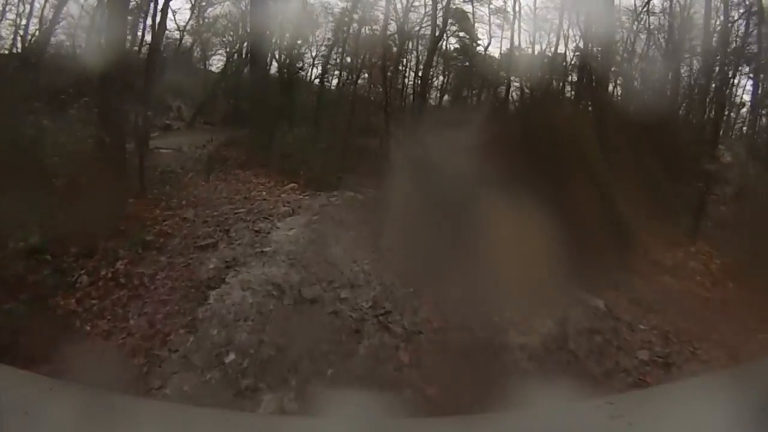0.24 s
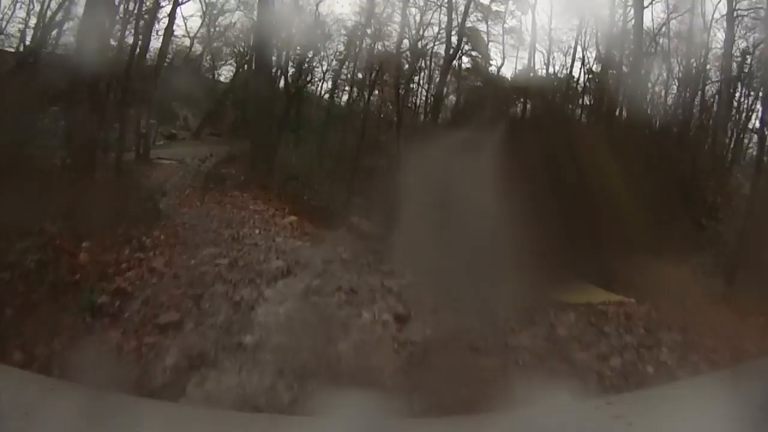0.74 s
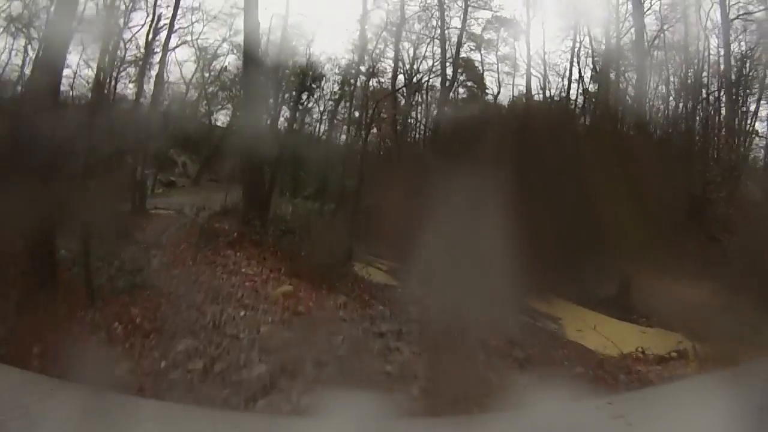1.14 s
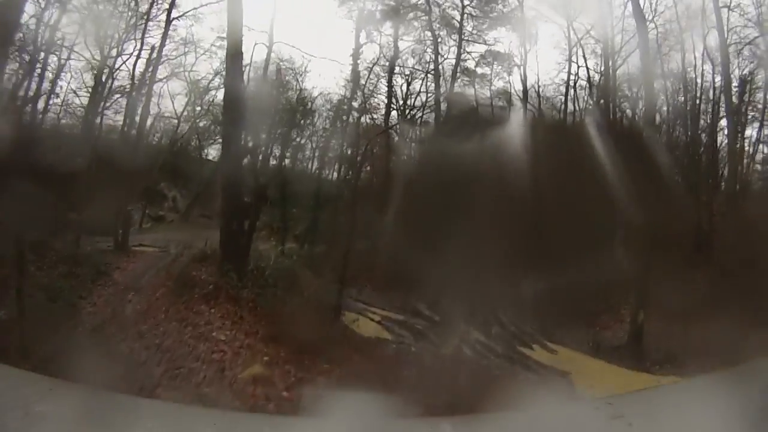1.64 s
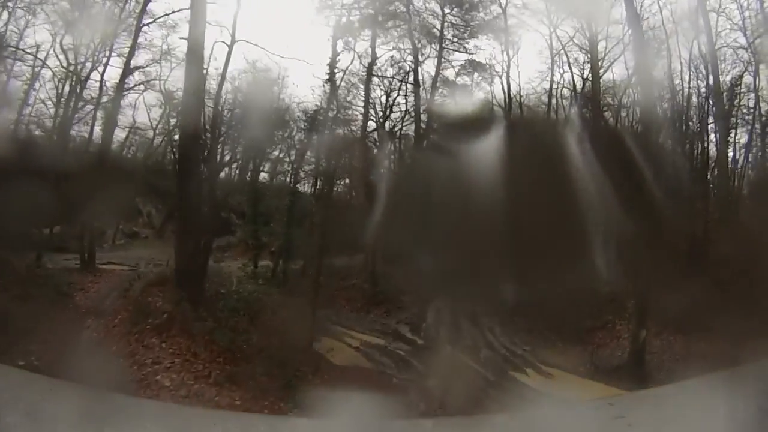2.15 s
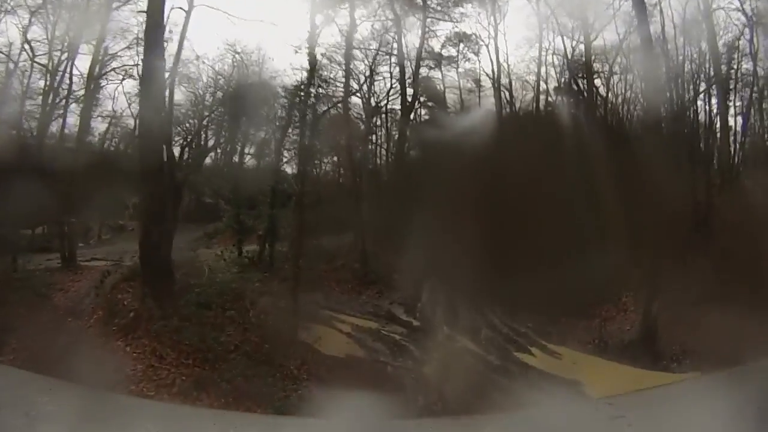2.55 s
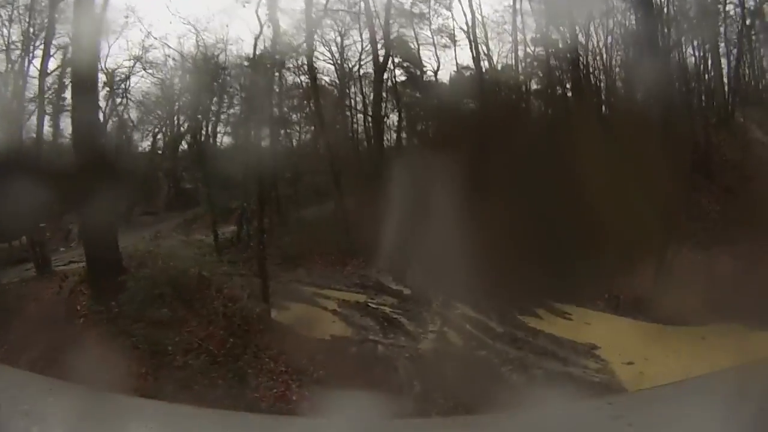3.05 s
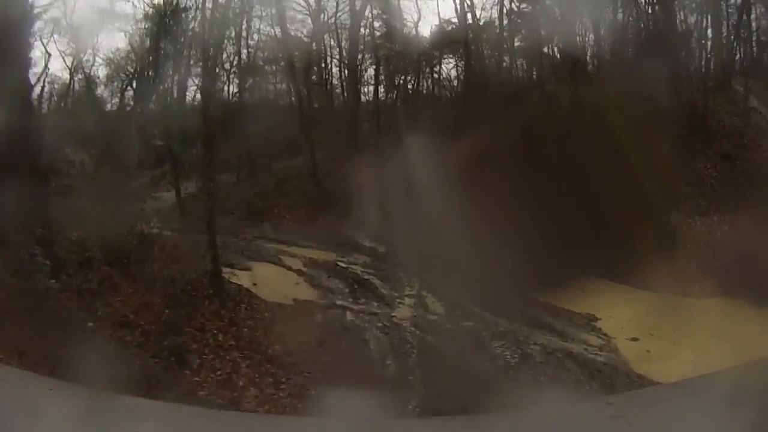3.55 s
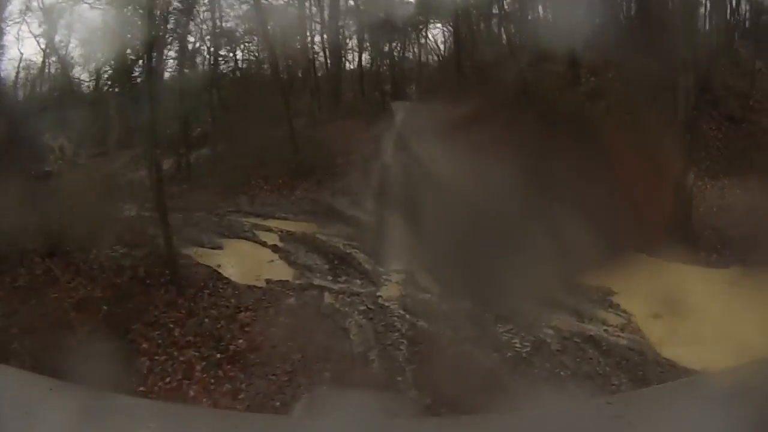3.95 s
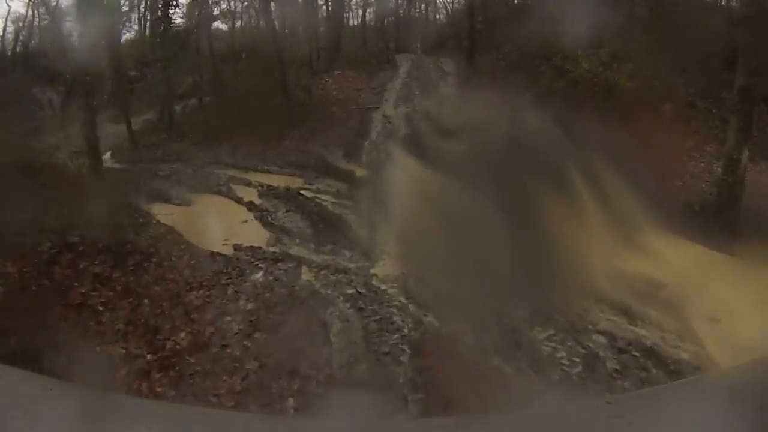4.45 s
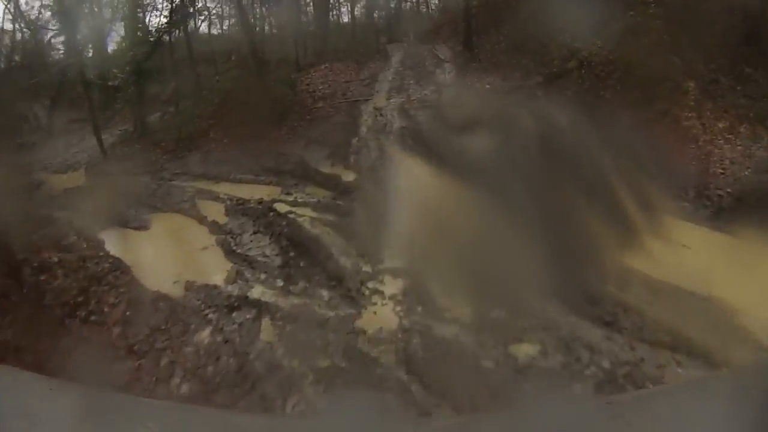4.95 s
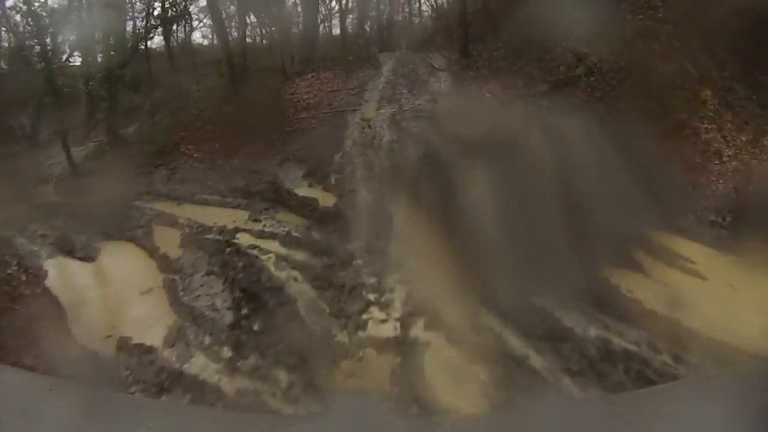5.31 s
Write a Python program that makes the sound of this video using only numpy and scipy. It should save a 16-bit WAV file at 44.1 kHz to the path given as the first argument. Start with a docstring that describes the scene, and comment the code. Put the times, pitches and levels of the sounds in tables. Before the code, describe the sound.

A diesel 4x4 crawls through wet woodland, heard in mono from a camera in a plastic case mounted on the vehicle. A deep, fluttering engine drone rises slightly in pitch and grows strong from about 0.9 to 2.3 s, over chassis rumble, buzzing steel clatter and a fine patter of drops. A very faint hiss lies underneath. Big drops knock on the panels, short and metallic with a dull thud, at 0.6, 1.0 and 1.35 s, the last with a sharp plastic snap. The loudest dry snap hits at 2.4 s, just as the revs sag and the drone fades. Knocks cluster from 2.6 to 3.7 s, hard at 2.9 and 3.4 s, while the body bounces and hums low. After 4.2 s the revs climb steadily; knocks fall at 4.25 and 4.85 s, and a heavier low bounce swells at the end, around 5.5 s.

```python
"""Wet wood, on the bodywork of a crawling diesel 4x4, by a camera in a plastic case.
The engine's firing orders are wavering sines, over noise shaped into chassis rumble and bounce.
Combustion clatter and a patter of small drops buzz the steel panels; a faint hiss lies beneath.
Big drops from the trees knock on the panels as sums of decaying plate modes with a dull thud.
A few drops tick on the case itself as short, dense modes and one hollow tone."""
import sys
import numpy as np
from scipy import signal
from scipy.fft import rfft, irfft
from scipy.io import wavfile
from scipy.ndimage import uniform_filter1d

SR = 44100
rng = np.random.default_rng(int(sys.argv[2]) if len(sys.argv) > 2 else 0)


def wav_out(sig):
    """Save sig, one row per channel (or a flat mono array), as 16-bit PCM at SR to the path in sys.argv[1]."""
    wavfile.write(sys.argv[1], SR, np.round(np.clip(np.atleast_2d(sig).T, -1, 1) * 32767).astype(np.int16))


N = 246071
T = np.arange(N) / SR  # s


def amp(db):
    """Decibels to gain."""
    return 10 ** (np.asarray(db) / 20)


def evened(x):
    """Scales to rms 1."""
    return x / np.sqrt(np.mean(x ** 2) + 1e-20)


def read(hz, table, column=1):
    """Reads a spectrum table on a log-frequency axis."""
    rows = np.array(table)
    return np.interp(np.log(hz + 1), np.log(rows[:, 0] + 1), rows[:, column])


def curve(table, column):
    """Reads a control curve at every sample."""
    rows = np.array(table)
    return np.interp(T, rows[:, 0], rows[:, column])


def add(mix, start_s, sound):
    """Mixes a sound in at its start time, cut at the end of the mix."""
    part = mix[round(start_s * SR):][:len(sound)]
    part += sound[:len(part)]


def coloured(spectrum, gate=1, colour_db=None):
    """Noise of rms 1, gated if wished, kept inside a table's range and coloured by it or by colour_db."""
    hz = np.fft.rfftfreq(N, 1 / SR)
    inside = (hz > spectrum[0][0]) & (hz < spectrum[-1][0])
    level_db = colour_db(hz) if colour_db else read(hz, spectrum)
    noise = gate * rng.standard_normal(N)
    return evened(irfft(rfft(noise) * amp(level_db) * inside, N))


def wobble(seconds):
    """Slow random drift of rms 1: noise averaged twice over the given time."""
    size = max(int(seconds * SR), 1)
    once = uniform_filter1d(rng.standard_normal(N), size)
    return evened(uniform_filter1d(once, size))


FLUTTER_S = 0.074  # averaging time of the level flutter in engine and body

# Engine speed. Each row: time in seconds, firings per second.
FIRING_RATE = [(0.0, 30.8), (0.3, 32.7), (0.57, 32.8), (0.9, 35.5), (1.12, 36.7), (1.3, 36.3), (1.54, 37.4),
               (1.86, 37.4), (2.1, 35.7), (2.36, 34.5), (2.53, 30.2), (2.64, 29.2), (3.15, 28.8),
               (3.3, 27.9), (3.8, 28.2), (4.1, 29.5), (4.27, 34.4), (4.49, 35.1), (4.68, 37.6),
               (4.99, 42.0), (5.14, 42.4), (5.46, 46.0), (5.58, 46.0)]


def engine_speed():
    """Firings per second; the flywheel evens the speed over a tenth of a second."""
    return uniform_filter1d(curve(FIRING_RATE, column=1), SR // 10)


# The drone at the firing rate, loudest under load near the pitch of the body.
# Each row: time in seconds, level in dB.
DRONE = [(0.0, -33.5), (0.3, -30.5), (0.6, -20), (0.79, -28), (0.9, -16.5), (1.12, -16), (1.46, -17.5),
         (1.85, -15), (2.24, -16), (2.36, -19.5), (2.52, -36), (3.15, -44), (3.5, -30), (4.4, -32),
         (4.6, -22), (4.86, -16), (4.99, -26), (5.27, -25), (5.5, -23), (5.58, -23)]
# The higher multiples of the firing rate that sound.
UPPER_ORDERS = (2, 3, 5, 7)
# How the bodywork passes those upper orders. Each row: frequency in Hz, level in dB.
ORDER_PATH = [(56, -36), (74, -35.5), (87, -38), (105, -48.5), (122, -41.5), (140, -43), (160, -49.5),
              (185, -42), (205, -45), (230, -54.5), (255, -65), (320, -63)]
DRONE_FLUTTER_DB, ORDER_FLUTTER_DB = 0.6, 3  # rms


def exhaust(turns, rate):
    """Firing orders as slightly wavering sines; the upper ones swell where the bodywork passes them."""
    levels_db = [curve(DRONE, column=1) + DRONE_FLUTTER_DB * wobble(FLUTTER_S)]
    for order in UPPER_ORDERS:
        levels_db.append(read(order * rate, ORDER_PATH) + ORDER_FLUTTER_DB * wobble(FLUTTER_S))
    out = np.zeros(N)
    for order, level_db in zip((1,) + tuple(UPPER_ORDERS), levels_db):
        waver = 0.02 * order * wobble(0.11)  # radians
        phase = 2 * np.pi * (order * turns + rng.random()) + waver
        out += np.sqrt(2) * amp(level_db) * np.sin(phase)
    return out


# Shaking of the vehicle; the last column drives the panel buzz further down.
# Each row: time in seconds, body bounce in dB, chassis rumble in dB, panel buzz in dB.
SHAKE = [(0.0, -56, -37, -38.5), (0.39, -34, -34.5, -38), (2.1, -36, -35, -36.5), (2.75, -44.5, -35.5, -39),
         (3.26, -29, -34.5, -41.5), (3.64, -27.5, -35.5, -39.5), (4.26, -36, -35.5, -40.5),
         (4.94, -41, -33, -39), (5.31, -32.5, -32.5, -38.5), (5.58, -19, -32.5, -37)]
# Colour of the chassis rumble. Each row: frequency in Hz, level in dB per Hz.
RUMBLE = [(15, -18), (44, -4.5), (60, -12.5), (93, -9), (115, -16), (150, -16), (185, -15.5), (203, -8),
          (225, -14), (250, -23.5), (280, -19), (311, -26.5), (370, -27), (450, -30.5)]
# The body rings at its own pitch, beating with the engine whenever the revs are away from it.
# Each row: time in seconds, pitch in Hz, level in dB.
BODY = [(2.4, 38.35, -46), (2.55, 39, -40), (3.0, 39.6, -38), (3.13, 39.2, -44), (3.45, 37.08, -31.5),
        (3.8, 36.86, -29), (4.15, 37.06, -31), (4.35, 36.7, -32), (4.85, 36.58, -50), (5.1, 36.66, -35),
        (5.35, 34.8, -30), (5.58, 34.7, -41)]
BOUNCE_HZ, BOUNCE_WIDTH_HZ = 52, 44
BODY_FLUTTER_DB = 3  # rms


def chassis():
    """Bumps shake a broad low mode and set the body ringing, over a wide rumble."""
    hz = np.fft.rfftfreq(N, 1 / SR)
    mode = 1 / (1 + (2 * (hz - BOUNCE_HZ) / BOUNCE_WIDTH_HZ) ** 4)
    bounce = evened(irfft(rfft(rng.standard_normal(N)) * mode, N))
    rumble = amp(1.3 * wobble(0.03)) * coloured(RUMBLE)
    cycles = np.cumsum(curve(BODY, column=1)) / SR + rng.random()
    ring_db = curve(BODY, column=2) + BODY_FLUTTER_DB * wobble(FLUTTER_S)
    ringing = np.sqrt(2) * amp(ring_db) * np.sin(2 * np.pi * cycles)
    return amp(curve(SHAKE, column=1)) * bounce + amp(curve(SHAKE, column=2)) * rumble + ringing


# Broad colour of the steel panels. Each row: frequency in Hz, level in dB per Hz.
PANEL = [(350, -7.5), (470, -5.5), (520, 1.5), (750, -3), (1050, -8), (1220, -12.5), (1600, -1),
         (1950, -13.5), (2200, -2.5), (2650, -16), (3100, -16.5), (3400, -33), (3800, -35.5), (4150, -24),
         (4450, -26), (4750, -23), (5150, -31), (5600, -27), (6400, -72)]
# Their strongest resonances. Each row: frequency in Hz, width in Hz, dB above the rest.
PANEL_PEAKS = [(515.4, 50, 5), (625, 187, 4.5), (840, 24, 4), (1105, 33, 9.5), (1720, 82, 7),
               (2217, 420, 0.5), (2860, 48, 3), (3610, 90, 8), (5470, 250, 5.5)]


def panel_db(hz):
    """The colour of the steel in dB: a broad spectrum with its resonances on top."""
    peaks = sum(db / (1 + (2 * (hz - peak_hz) / width_hz) ** 2) for peak_hz, width_hz, db in PANEL_PEAKS)
    return read(hz, PANEL) + peaks


# How a struck panel rings: bending waves carry treble first, bass arrives late and lasts. Each row:
# frequency in Hz, rise in seconds, time to fall 60 dB in seconds, dB by which a blow favours it.
PANEL_RING = [(390, 0.0091, 0.27, -14.5), (560, 0.0018, 0.2, -13), (806, 0.0011, 0.23, -8),
              (1500, 0.003, 0.13, -2.5), (2940, 0.001, 0.11, 6.5), (6000, 0.00064, 0.08, 3.5)]


def panel_blows(lows_db, highs_db, length, crack_db):
    """One blow a row: dense plate modes, struck with other phases at each spot."""
    hz = (np.linspace(350, 6400, 400) + rng.uniform(-7, 7, 400))[:, None]
    t = np.arange(6000) / SR
    rise = 1 - np.exp(-t / read(hz, PANEL_RING))
    fade = amp(-60 * t / read(hz, PANEL_RING, column=2))
    mode_db = panel_db(hz) + read(hz, PANEL_RING, column=3)
    modes = amp(mode_db) * rise * fade * np.exp(2j * np.pi * hz * t)
    lows = np.clip((1300 - hz.T) / 400, 0, 1)  # full below 900 Hz
    highs = np.clip((hz.T - 3400) / 500, 0, 1)  # full above 3900 Hz
    spot = np.exp(2j * np.pi * rng.random((len(length), 400)))
    struck = spot * amp(lows_db[:, None] * lows + highs_db[:, None] * highs)
    # the direct wave, without the lows, before the plate fills
    crack = amp(crack_db)[:, None] * np.exp(-t / 0.0016)
    blows = (struck @ modes).real + crack * (struck * (1 - lows) @ modes).real
    blows /= np.sqrt(np.mean(blows[:, :300] ** 2, axis=1, keepdims=True))  # even the onsets
    # a wetter spot, of length under 1, damps all modes sooner
    damping = 1 / np.clip(length, 0.2, 1.5)[:, None] - 1
    return 0.3 * blows * amp(-600 * t * damping)


DROPS_PER_S, PATTER_DB = 160, -5.5  # small drops; level against the clatter


def buzz(turns):
    """The panels buzz: noise puffed by each firing, plus a patter of small drops."""
    firing_gain = amp(2.1 * np.clip(rng.standard_normal(400), -2, 2))  # no two firings alike
    strength = firing_gain[turns.astype(int)]
    # each puff jumps up, then sags until the next firing
    puffs = uniform_filter1d(0.2 + 2.3 * strength * np.exp(-(turns % 1) / 2.7), 150)
    clatter = coloured(PANEL, puffs * amp(0.8 * wobble(0.008)), panel_db)
    size = amp(3.5 * np.minimum(rng.exponential(1, N), 2))
    drops = size * (rng.random(N) < DROPS_PER_S / SR)
    spot, flat = rng.integers(0, 12, N), np.zeros(12)  # twelve spots on the steel
    blows = panel_blows(flat, flat, length=flat + 0.49, crack_db=flat - 3.0)
    patter = evened(sum(signal.oaconvolve(drops * (spot == k), b)[:N] for k, b in enumerate(blows)))
    return amp(curve(SHAKE, column=3)) * evened(clatter + amp(PATTER_DB) * patter)


# Colour of the hiss. Each row: frequency in Hz, level in dB per Hz.
HISS = [(3300, -26), (6000, -9), (7040, -12.5), (11300, -14.5), (13900, -17.5), (14700, -19)]
HISS_DB = -68


def hiss():
    """A faint bed of treble noise whose level flickers quickly."""
    return amp(HISS_DB + 1.54 * wobble(0.0086)) * coloured(HISS)


# Drops on the case. Each row: start in seconds, relative level in dB, pitch of the hollow in Hz,
# hollow in dB, modes under 5 kHz in dB, modes over 9 kHz in dB.
TICKS = [(0.1366, -39, 1670, -6, -2, 16), (0.5408, -33, 2120, -5, 3, 18), (0.631, -36, 2130, -3.5, -4, 20),
         (0.9733, -26.5, 1720, -4, 17.5, 11.5), (1.3512, -4.5, 2680, -9, 1, 5.5),
         (1.3562, -13.5, 2250, -14, 11.5, 6), (2.3844, 2, 1880, -4, -4, -1), (2.4103, -29, 2140, 1, 5, 15),
         (2.5741, -20.5, 2420, -8, 10, 14), (2.8625, -13.5, 1910, 4, 0, 10), (2.936, -36, 2120, -3, -1, 16),
         (3.3962, -35, 2280, -10, -3, 22), (3.4141, -22, 2260, -5, 6, 15), (3.4552, -31, 2680, -3, 0, 10),
         (3.46, -26.5, 2180, 4, -11, 7), (3.531, -13.5, 2500, 2, 3, 3), (3.5862, -36, 2124, 4, 0, 15),
         (3.6691, -28.5, 1770, -1, 11, 16), (3.8578, -18.5, 1500, 8, 3, 12), (4.244, -39, 2130, -3, 4, 19),
         (4.597, -29.5, 2100, -12, 2, 6), (4.8382, -30.5, 2260, 5, 11, 9), (5.3328, -24.5, 1600, 0, 8.5, 5)]
# Colour of the case. Each row: frequency in Hz, level in dB per Hz.
CASE = [(650, -45), (1100, -6), (1990, -5), (2910, -3), (3730, -18), (4580, -5.5), (5150, -18), (5550, -8),
        (5920, -2.5), (6480, -19.5), (7200, -8), (8700, -20), (10300, -34), (12400, -26.5), (13500, -32),
        (14700, -40)]
# Decay of the case. Each row: frequency in Hz, time to fall 60 dB in seconds.
CASE_T60 = [(1500, 0.0067), (4000, 0.014), (8000, 0.0076), (14000, 0.0091)]


def ticks():
    """Drops on the plastic case: a dry snap of dense short modes and one hollow, right at the microphone."""
    hz, t = np.linspace(1200, 14800, 70)[:, None], np.arange(900) / SR
    fade = amp(-60 * t / read(hz, CASE_T60))
    out, phases = np.zeros(N), rng.random((len(TICKS), len(hz), 1))
    for (start_s, level_db, hollow_hz, hollow_db, lows_db, highs_db), phase in zip(TICKS, phases):
        struck_db = read(hz, CASE) + lows_db * (hz < 5000) + highs_db * (hz > 9000)
        modes = amp(struck_db) * fade * np.sin(2 * np.pi * (hz * t + phase))
        snap = 0.34 * modes.sum(axis=0)
        hollow = amp(hollow_db) * fade[0] * np.sin(2 * np.pi * hollow_hz * t)
        rise = 1 - np.exp(-t / 0.00027)
        add(out, start_s, amp(level_db) * (snap + hollow) * rise)
    too_small_for_bass = signal.butter(4, 1200, "high", fs=SR, output="sos")
    return signal.sosfilt(too_small_for_bass, out)


# Big drops on the steel. Each row: start in seconds, relative level in dB, lows in dB (full under
# 900 Hz, none over 1300 Hz), ring length as a factor (held to 0.2-1.5), first crack in dB.
KNOCKS = [(0.4286, -30, -7, 1.3, -5), (0.6314, -9.5, 8.5, 0.62, 7), (0.6763, -27.5, 2, 1, 2),
          (0.9728, -9, 3.5, 0.71, 5), (1.04, -23.5, 11, 0.45, 10), (1.1857, -26, 6, 0.81, 10),
          (1.2432, -18.5, 7, 0.58, 13), (1.3504, -9.5, 12, 0.88, -12), (1.4228, -25.5, 5, 1.5, 6),
          (2.0995, -23, -1, 0.67, 2), (2.4103, -22.5, 3.5, 1.05, 7), (2.4204, -25, 13, 0.58, -3),
          (2.5764, -11.5, 3.5, 0.83, 6), (2.5872, -16, 13, 0.79, 6), (2.9359, -4, 4.5, 0.98, 24),
          (3.0941, -26, 7.5, 0.75, 0), (3.1374, -28, 5, 0.75, 10), (3.206, -26.5, 0, 1.4, 9),
          (3.3976, -8.5, 12.5, 0.97, 22), (3.4145, -4, 5, 0.52, 2), (3.466, -20.5, 7, 0.3, 8),
          (3.5456, -23.5, 8, 0.7, -1), (3.6713, -14, 8.5, 0.73, 5), (3.9844, -25, 1, 1.25, 4),
          (4.2449, -12, 10.5, 0.75, -1), (4.4004, -26.5, 6, 0.92, 8), (4.8174, -24, 2, 0.45, 3),
          (4.8391, -7.5, 11.5, 0.77, 12), (5.0246, -24, 9, 0.66, -9), (5.4824, -23.5, -1, 1.2, 8)]
# Modes of the whole panel's thud. Each row: frequency in Hz, level in dB.
THUD = [(145, 3), (200, -8), (255, -0.5), (320, -5)]
THUD_T60 = 0.072  # s to fall 60 dB
THUD_DB, THUD_PER_LOWS_DB = -21, 1.35  # a blow rich in lows thuds the more
KNOCK_HIGHS_DB = -1


def knocks():
    """Big drops falling from the trees on the steel, each with a dull thud of the whole panel."""
    start_s, level_db, lows_db, length, crack_db = np.transpose(KNOCKS)
    highs_db = np.full(len(start_s), KNOCK_HIGHS_DB)
    thud_db = THUD_DB + THUD_PER_LOWS_DB * lows_db
    out, t = np.zeros(N), np.arange(6000) / SR
    sway = sum(amp(db) * np.sin(2 * np.pi * hz * t) for hz, db in THUD)
    thud = sway * (1 - np.exp(-t / 0.013)) * amp(-60 * t / THUD_T60)
    for k, blow in enumerate(panel_blows(lows_db, highs_db, length, crack_db)):
        add(out, start_s[k], amp(level_db[k]) * (blow + amp(thud_db[k]) * thud))
    return out


def scene():
    """Engine, chassis, panels, hiss and rain summed to one channel."""
    rate = engine_speed()
    turns = np.cumsum(rate) / SR  # firings so far
    vehicle = exhaust(turns, rate) + chassis() + buzz(turns)
    return (vehicle + hiss() + ticks() + knocks())[None]


EDGE_HZ = 15500


def record(dry):
    """The microphone drops the deepest bass, then a steep band limit ends the treble."""
    heard = signal.sosfilt(signal.butter(3, 24, "high", fs=SR, output="sos"), dry)
    band_limit = signal.firwin(511, EDGE_HZ, window=("kaiser", 9), fs=SR)
    return signal.oaconvolve(heard, band_limit[None], "same")


dry = scene()
out = record(dry)
wav_out(out)
```